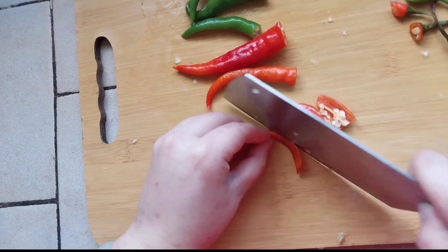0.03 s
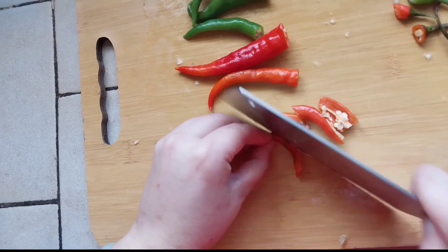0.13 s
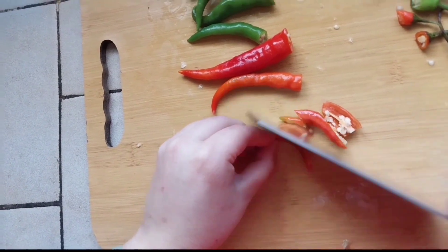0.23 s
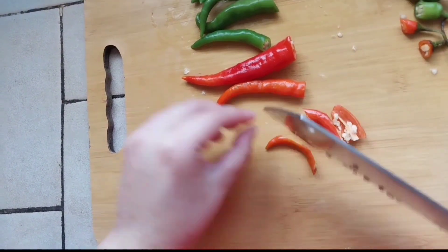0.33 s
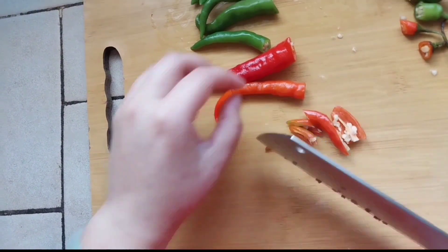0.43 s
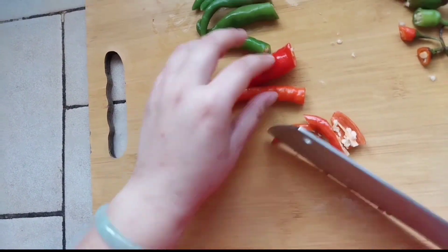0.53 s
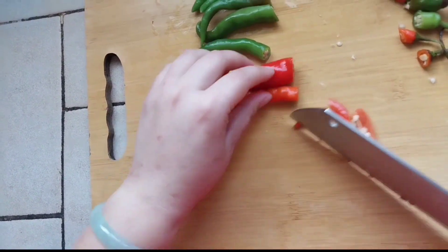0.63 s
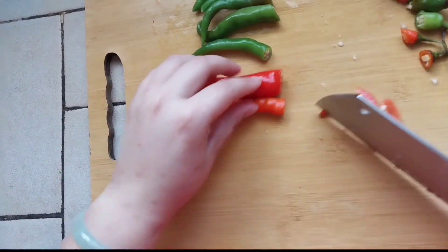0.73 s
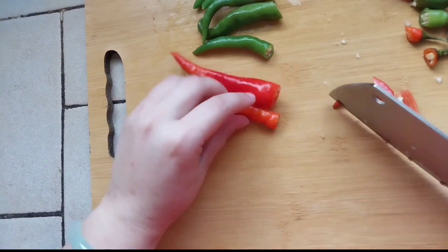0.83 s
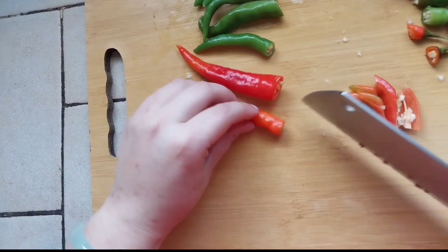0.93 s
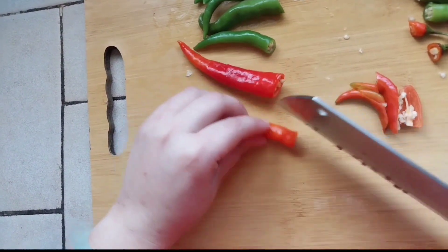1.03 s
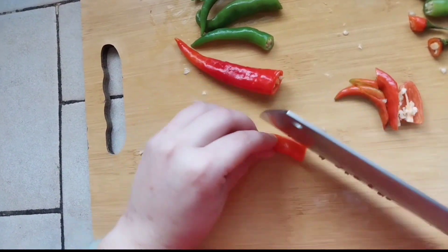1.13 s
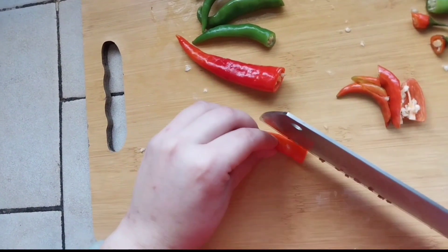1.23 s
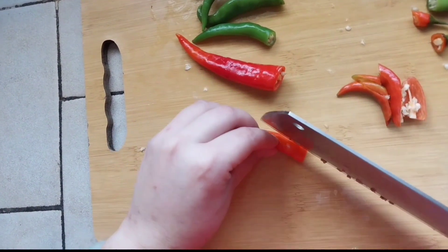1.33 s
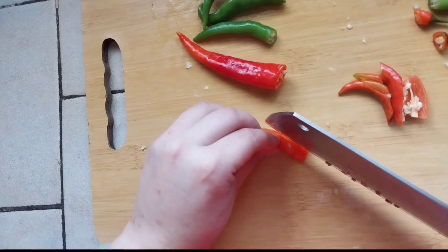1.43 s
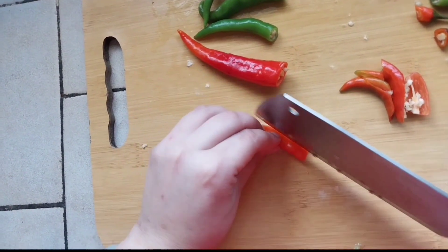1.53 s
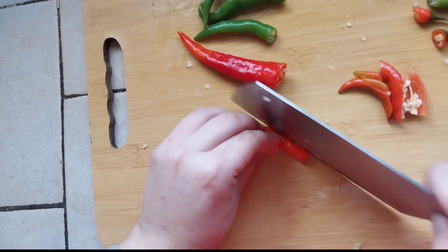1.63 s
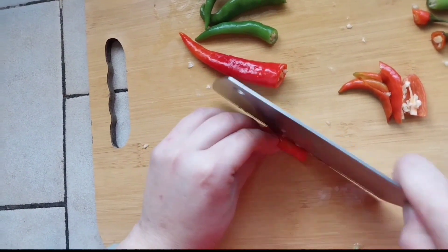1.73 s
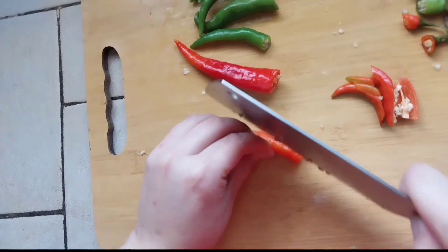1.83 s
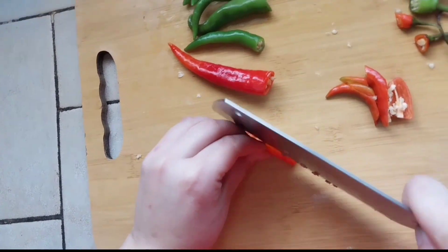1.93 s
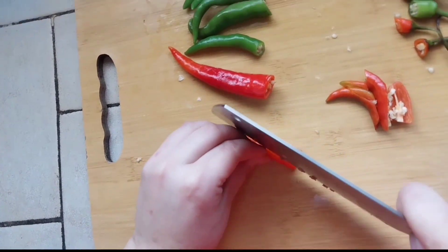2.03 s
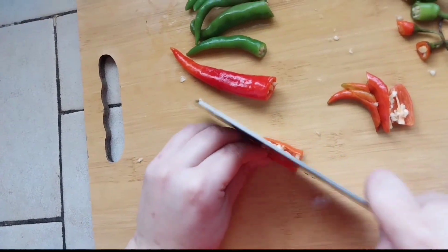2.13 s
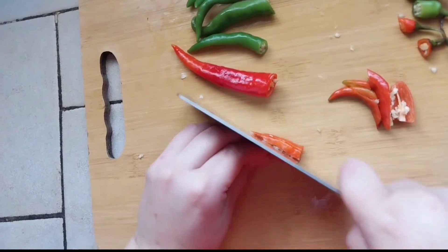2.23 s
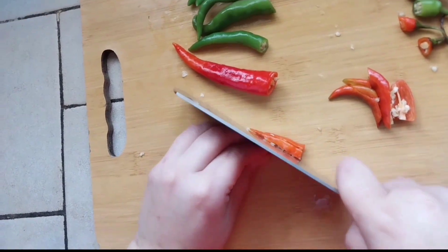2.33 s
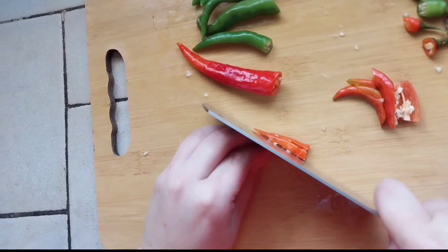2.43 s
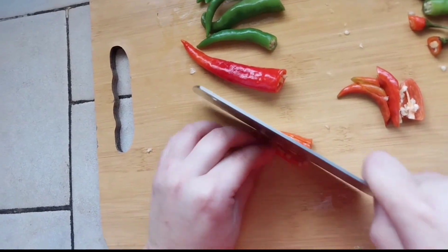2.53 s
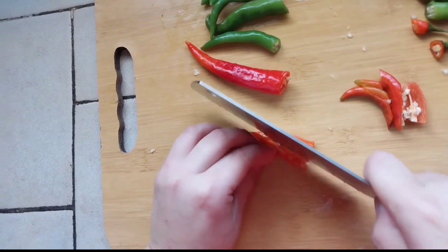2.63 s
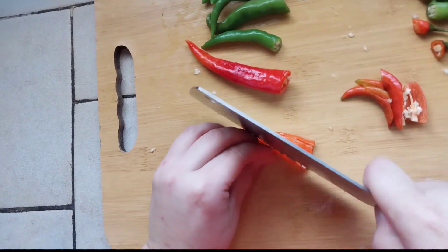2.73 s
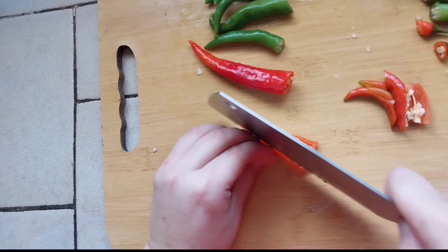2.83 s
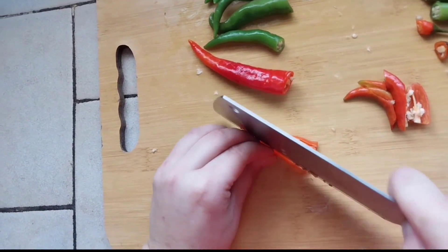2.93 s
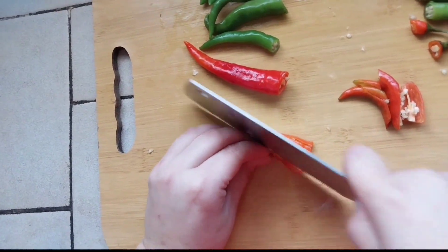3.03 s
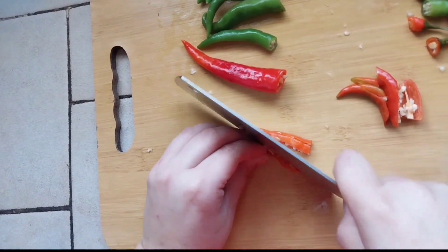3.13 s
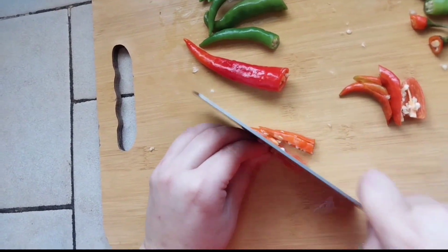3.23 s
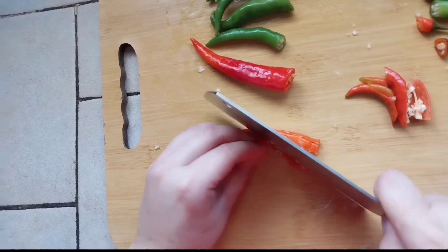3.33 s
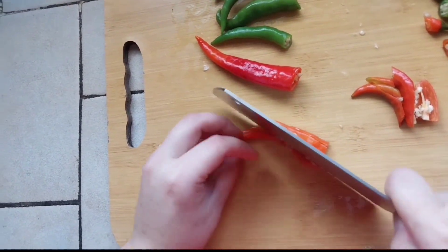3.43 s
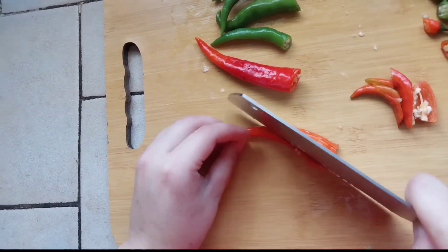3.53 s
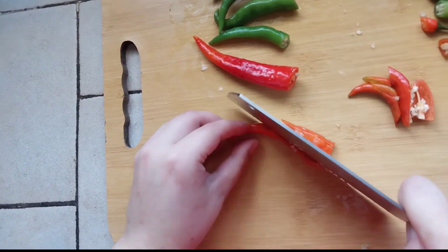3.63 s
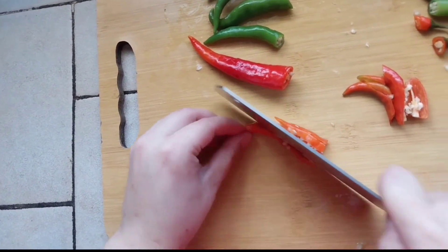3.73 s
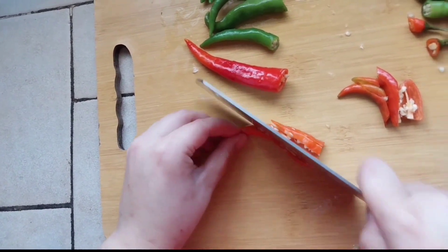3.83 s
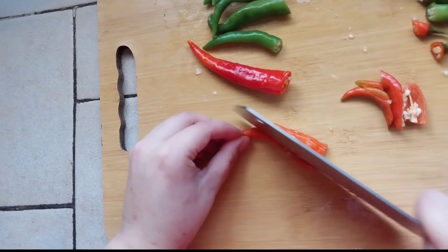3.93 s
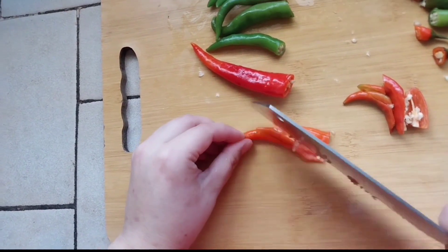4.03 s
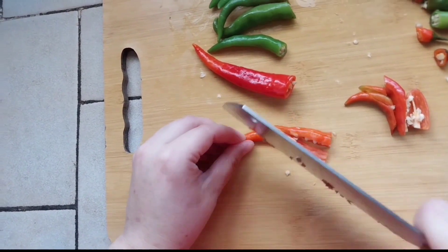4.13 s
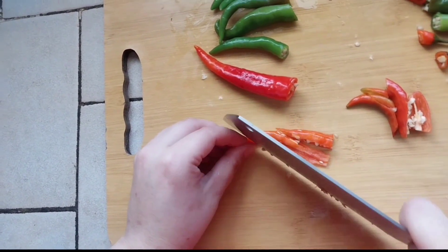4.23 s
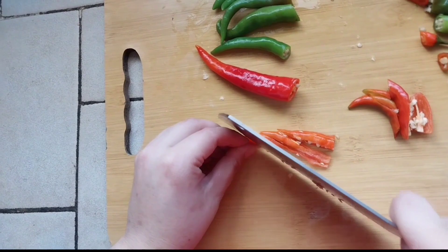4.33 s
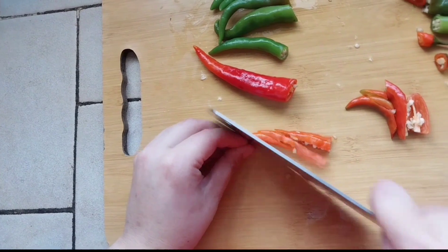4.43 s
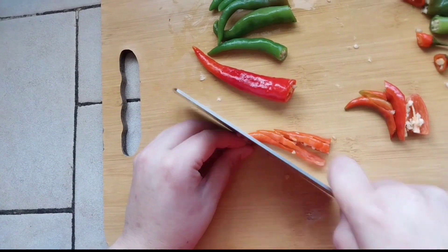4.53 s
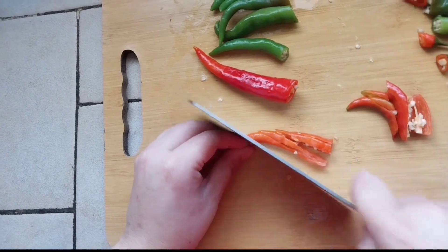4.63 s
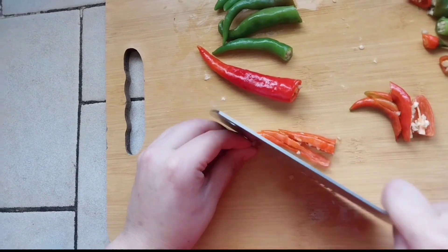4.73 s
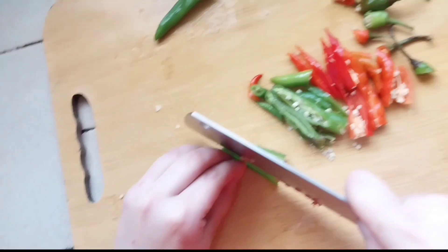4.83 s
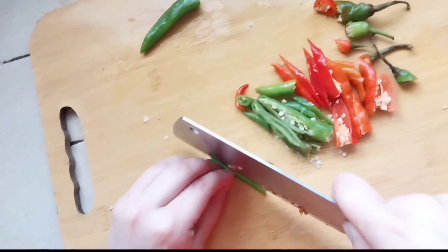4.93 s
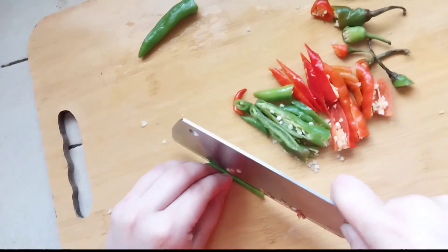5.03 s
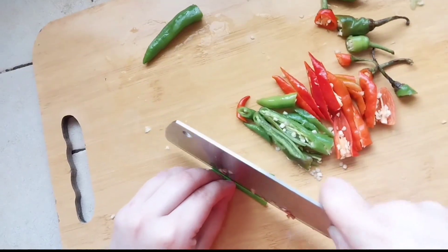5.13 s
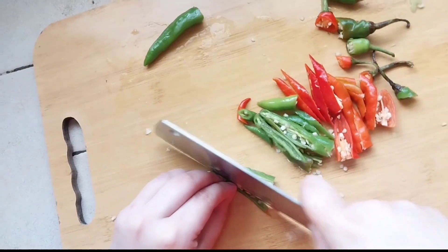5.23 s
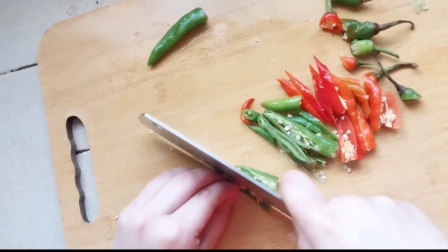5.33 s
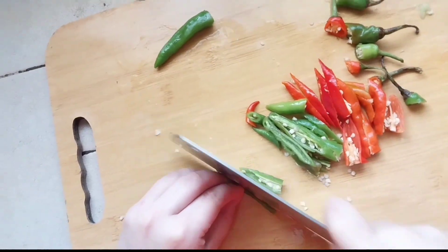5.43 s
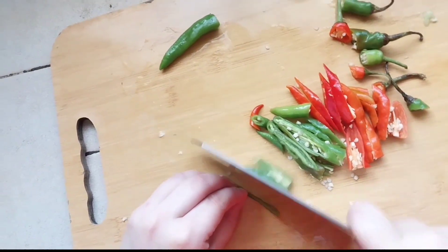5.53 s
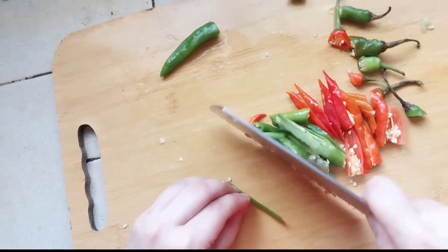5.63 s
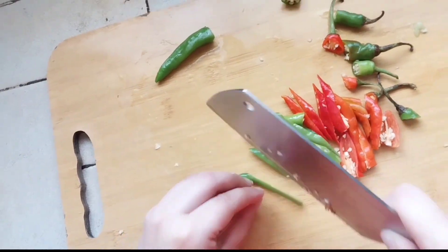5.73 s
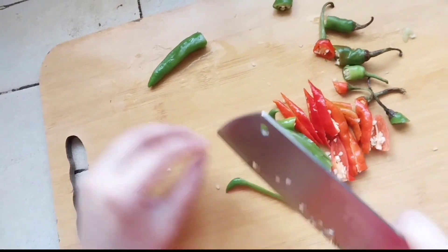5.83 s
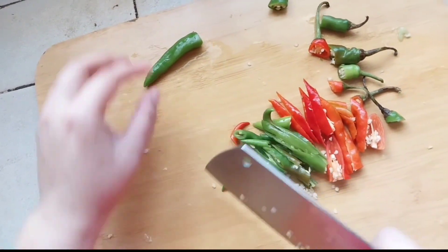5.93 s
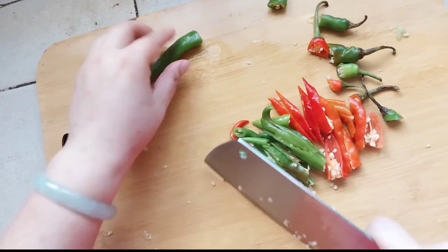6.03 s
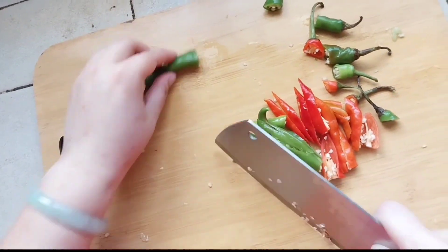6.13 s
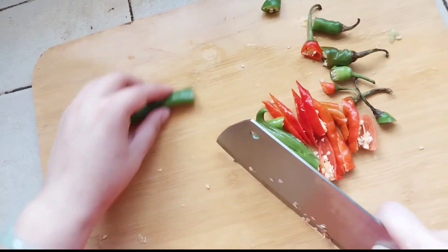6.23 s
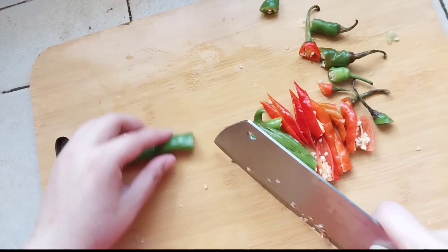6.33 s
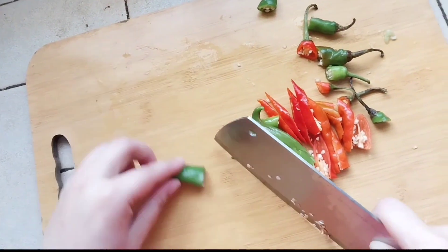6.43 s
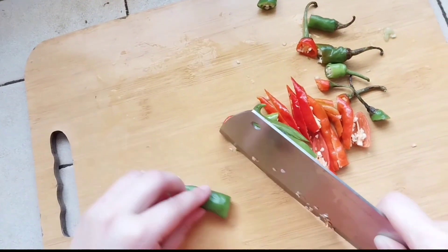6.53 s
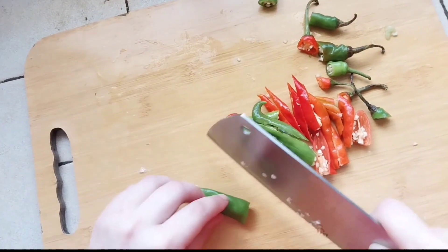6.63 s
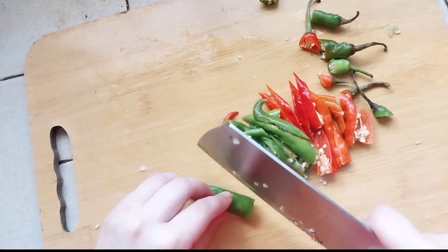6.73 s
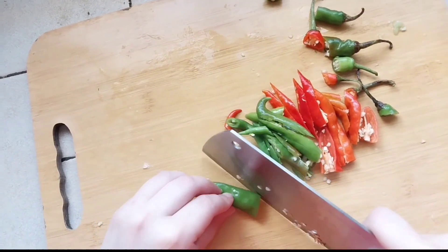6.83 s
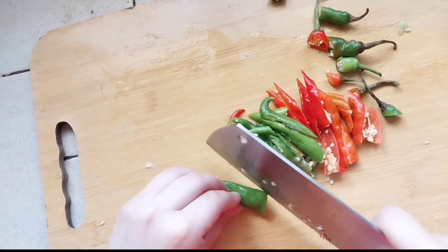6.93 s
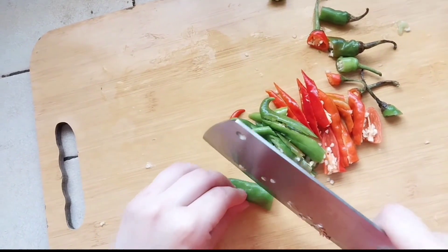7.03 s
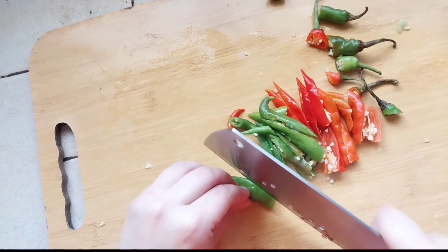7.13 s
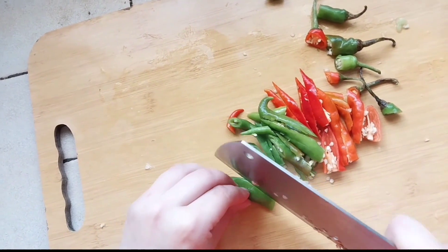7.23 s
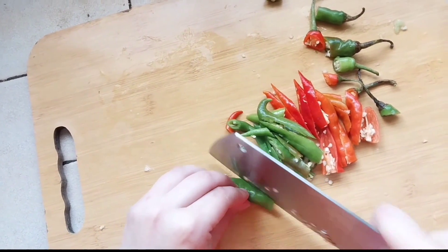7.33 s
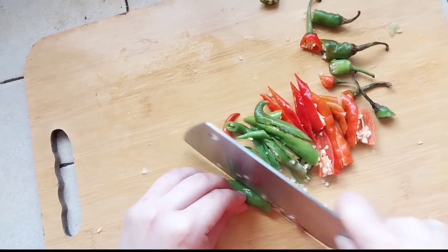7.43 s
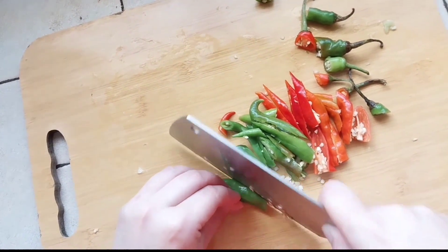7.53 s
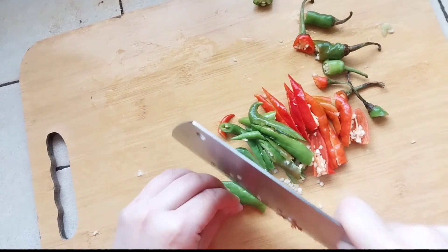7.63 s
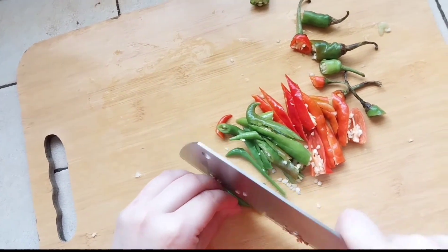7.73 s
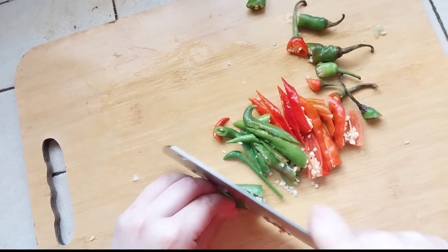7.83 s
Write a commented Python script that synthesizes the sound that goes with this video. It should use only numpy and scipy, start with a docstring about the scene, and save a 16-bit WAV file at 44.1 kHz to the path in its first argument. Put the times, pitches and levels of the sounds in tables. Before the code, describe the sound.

A cleaver crunches through chilli peppers with crisp wet slices and hard woody knocks on a cutting board, at uneven intervals in a quiet kitchen.

```python
"""In a small kitchen, a cleaver slices chilli peppers on a wooden board lying on a tiled counter.
Two close microphones hear it. Random clicks make the crunch and fizz of each cut, noise bursts make the snaps,
and bell-shaped blows make the knocks that set the wood ringing. Between cuts the flat blade scrapes slices
aside and rings. Low resonances make the board and counter rumble, delays make the kitchen echoes,
and soft coloured noise fills the background."""
import sys
import numpy as np
from scipy import signal
from scipy.fft import rfft, irfft, next_fast_len
from scipy.io import wavfile

SR = 44100
rng = np.random.default_rng(int(sys.argv[2]) if len(sys.argv) > 2 else 0)


def pcm_store(signal):
    """Save signal as 16-bit PCM."""
    levels = np.round(np.clip(np.atleast_2d(signal), -1, 1) * 32767)
    wavfile.write(sys.argv[1], SR, levels.astype(np.int16).T)


N = 347508   # length of the sound in samples

# All table levels are relative: later gains can shift them.
# The edge bites, tears or slides, or fingers brush the peppers: (start [s], length [s], push on the wood [dB],
# crunch of flesh [dB], fizz of skin and juice [dB], swell towards the end [dB], fall [dB/s])
STROKES = [(.017, 0.028, -17, -35.5, -35.5, 9.5, 601), (.075, 0.077, -41.5, -67, -70.5, -6, 900),
           (.41, 0.084, -67, -70.5, -102, -1, 103), (.76, 0.056, -62, -78, -70.5, 5, 500),
           (.985, 0.016, -81, -82, -80, 7, 152), (1.15, 0.035, -89, -86, -83, -2, 154),
           (1.33, 0.021, -86, -101, -84, 3, 100), (1.538, 0.0093, -55, -72, -55.5, 8, 596),
           (1.59, 0.043, -61, -68, -55.5, 6, 497), (1.665, .027, -24, -42, -38, 3, 415),
           (1.898, 0.0053, -60, -68, -64, 4, 900), (2.0, 0.11, -60.5, -75.5, -65, 17, 500.5),
           (2.14, 0.026, -50, -63.5, -52.5, 9.5, 595.5), (2.187, 0.011, -37.5, -53, -48, 2, 280.5),
           (2.257, 0.04, -18.5, -38.5, -37, 11.5, 999), (2.382, 0.024, -50, -62, -54.5, -3.5, 245),
           (2.53, 0.091, -65.5, -78.5, -74.5, 8, 350), (2.768, 0.0034, -70.5, -75, -70, 9, 305),
           (2.9, 0.19, -69, -66.5, -67.5, 12.5, 499.5), (3.036, 0.049, -19, -34.5, -32, 22, 1501.5),
           (3.205, 0.013, -47, -80, -78, 0, 900), (3.095, 0.02, -73, -57.5, -59, -4.5, 499),
           (3.158, 0.012, -36, -49.5, -47, 7, 270), (3.296, 0.0039, -55, -71, -60, -1, 550),
           (3.345, 0.019, -69, -60, -51, 43, 450), (3.412, 0.03, -50.5, -63.5, -59, 1.5, 252),
           (3.553, 0.0068, -53.5, -70, -64, 12, 323), (3.765, 0.15, -64, -72, -68.5, 1.5, 289.5),
           (3.93, 0.052, -50.5, -63.5, -62, 3, 592.5), (4.012, 0.015, -38, -43, -44.5, 7, 473),
           (4.128, 0.0063, -69, -95, -74.5, 1, 264), (4.456, 0.022, -14.5, -43, -39.5, 12, 457.5),
           (4.56, 0.16, -66.5, -77, -76.5, -5.5, 503), (4.78, 0.049, -81.5, -83.5, -74, -2.5, 194),
           (4.94, 0.0072, -54, -85, -65, 11, 408), (5.008, 0.0055, -59, -66, -52.5, 13.5, 650),
           (5.082, 0.049, -58, -72, -54.5, 5.5, 903), (5.172, 0.062, -51, -64.5, -46, 5.5, 805),
           (5.234, .038, -20, -38, -29.5, 8.5, 693), (5.34, 0.09, -72, -66, -62.5, 0.5, 800),
           (5.447, 0.011, -46, -58, -53.5, 3, 233), (5.855, 0.18, -60, -79, -71, 2.5, 303),
           (5.98, 0.027, -25.5, -40.5, -52, 8.5, 894), (6.41, 0.031, -53.5, -74.5, -71.5, 5, 51),
           (6.76, 0.078, -61.5, -75, -73.5, 5, 396), (6.866, 0.01, -26.5, -49, -53.5, 20, 403),
           (7.0, 0.13, -64, -80.5, -78.5, 0, 97), (7.2, 0.038, -61, -81, -74, 12, 397),
           (7.28, 0.039, -60, -80, -69, -0.5, 300), (7.31, 0.046, -40, -54, -49, 31, 209),
           (7.375, 0.071, -47, -55, -47, 1, 600), (7.421, .029, -28.5, -40.5, -41, 0, 902),
           (7.565, 0.0035, -46, -62.5, -67, 10, 310), (7.742, 0.0023, -52, -66, -58.5, 15, 600),
           (7.79, 0.054, -50, -66.5, -50.5, 29, 400)]
# The blade is dragged sideways over the wood: (start [s], length [s], push on the board [dB],
# coarse rubbing [dB], fine rubbing [dB], swell towards the end [dB], fall [dB/s])
SCRAPES = [(0.192, 0.011, -39, -53, -54.5, 2, 502), (0.213, 0.061, -48, -51.5, -47.5, 3, 506),
           (5.532, 0.058, -35, -40, -39, 4.5, 247), (6.032, 0.07, -41, -46.5, -47.5, 7, 150),
           (6.134, 0.042, -51.5, -57.5, -53.5, -3, 403)]
# How push, middle and treble (one row each) follow a stroke:
# (share of the swell [factor], share of the fall [factor], tail level [dB], tail fall [dB/s])
STROKE_SHAPES = [(1.35, 1.24, -26, 112.5), (2, 0.96, -23, 113.5), (0.96, 0.91, -21.5, 109.5)]
# Edge or slice knocks on the wood:
# (time [s], thud level [dB], contact [ms], ring level [dB], pitch favoured by where it lands [Hz])
KNOCKS = [(.0441, -19.5, 0.11, -14, 336), (.0587, -19, 0.59, -16, 400), (1.6682, -28, 0.81, -12, 700),
          (1.6962, -24, 0.32, -10, 333), (1.7095, -39, 0.39, -28, 330), (2.1937, -36.5, .25, -22.5, 700),
          (2.2615, -30.5, 0.083, -18, 708), (2.2769, -34.5, 0.31, -14.5, 700),
          (2.2974, -11, .33, -21.5, 679), (2.3858, -49, 0.2, -10, 704), (3.0867, -15.5, 0.34, -16.5, 722),
          (3.17, -36.5, 0.42, -15, 703), (3.177, -37, 0.34, -17, 600), (3.4453, -48, .23, -14, 400),
          (4.0235, -31, .25, -23.5, 1387), (4.466, -32, 0.3, -9, 650), (4.4896, -13.5, 0.29, -19.5, 577),
          (5.2479, -26, 0.9, -21, 351), (5.2719, -21.5, 0.33, -15, 300), (5.989, -34.5, 0.12, -7.5, 1500),
          (6.0038, -13.5, 0.13, -17.5, 504), (6.017, -31.5, 0.42, -6.5, 500),
          (6.868, -42.5, 0.094, -5.5, 1400), (6.8801, -16.5, .39, -19, 490), (6.908, -49.5, 0.11, -8, 1440),
          (7.3657, -35.5, 0.38, -36, 600), (7.42, -21, 0.34, -25, 553), (7.4548, -20.5, 0.71, -29, 270),
          (7.5748, -47, .34, -21, 600)]
# Skin and seeds snap: (time [s], starting level [dB], treble over middle [dB])
SNAPS = [(.0166, -20.5, 7.5), (.0257, -27, 2.5), (.197, -55, -11), (1.5433, -65, 9), (1.6095, -52, 1),
         (1.6637, -30.5, -21), (1.9004, -58, 11), (1.9978, -50.5, 7.5), (2.0729, -48, 2.5),
         (2.1426, -45, 19.5), (2.1923, -40.5, 7.5), (2.7705, -63, 9), (2.9727, -54, 7),
         (3.0835, -34.5, -14), (3.1748, -31, -3.5), (3.2991, -44.5, 1), (3.3655, -34, 21),
         (4.0228, -40.5, -12), (4.46, -38, 8.5), (4.9509, -56, 16), (5.0173, -44.5, -16.5),
         (5.0975, -39.5, 17), (5.1748, -59, 10), (5.2345, -20, 32), (5.45, -50, 3), (6.004, -29.5, -30),
         (6.8792, -28, -22), (7.2875, -53.5, -2), (7.4215, -23, -16), (7.5698, -50, 2), (7.7496, -57, 5),
         (7.8182, -34.5, 8)]
# Ringing tones of the wooden board: (pitch [Hz], level [dB], time to fall by 60 dB [s])
BOARD_MODES = [(112, -5.5, 0.28), (196, -25, 0.13), (258, -12, 0.082), (297, -4, 0.11), (383, 1.5, 0.05),
               (479, -3.5, 0.073), (560, 2.5, 0.022), (638, 5.5, .025), (680.4, -3, 0.11), (744, -3, 0.11),
               (770, 6.5, 0.013), (965, -10, 0.17), (1212, -15, 0.021), (1320, -14.5, 0.072),
               (1470, -7.5, 0.023), (1700, -15.5, 0.054), (1983, -8.5, 0.038), (2350, -18.5, .05),
               (2440, -21, 0.064)]
# Ringing tones of the steel blade: (pitch [Hz], width [Hz], level [dB])
BLADE_MODES = [(819, 32, -0.5), (1428, 26, 0), (1640, 50, -11.5), (2705, 7.4, 4.5), (5660, 63, -8),
               (6245, 15, 10), (7150, 260, -12.5), (7680, 120, -7.5), (10780, 71, -10.5), (11500, 200, -6),
               (12500, 100, -3), (13600, 90, -13), (14330, 60, -11.5)]
# Tone colour of the crunch, also of coarse rubbing: (frequency [Hz], level per Hz [dB])
CRUNCH_COLOUR = [(600, -22.5), (1100, 0.5), (1400, 3.5), (2000, -2), (2700, 0.5), (3800, -4), (5500, -23),
                 (9000, -29)]
# Tone colour of the fizz of tearing: (frequency [Hz], level per Hz [dB])
TEARING_COLOUR = [(2500, -23), (4200, -1), (6000, 1.5), (8500, -3.5), (12000, 0), (14500, -1.5),
                  (16000, -12)]
# Tone colour of fine rubbing: (frequency [Hz], level per Hz [dB])
RUBBING_COLOUR = [(2500, -37), (4200, -7.5), (6000, -8.5), (8500, -11), (10000, -10.5), (12000, -8),
                  (14500, -12), (16000, -8.5)]
# Hands or a chop rock the board on the counter: (time [s], hold [s], board rumble [dB], counter rumble [dB])
ROCKS = [(.02, 0.089, -53, -50), (0.24, 0.018, -63, -68.5), (.5, .03, -87, -71), (0.59, 0.022, -68, -73),
         (.8, 0.0084, -58.5, -65.5), (1.001, 0.011, -57, -64), (1.171, 0.028, -58, -63.5),
         (1.394, .01, -63.5, -70), (1.558, 0.026, -53.5, -63), (1.68, 0.0072, -49.5, -47.5),
         (1.91, 0.081, -63, -67), (2.08, 0.068, -60, -64), (2.26, 0.064, -47.5, -56.5),
         (2.6, 0.0077, -68, -71), (2.76, 0.11, -59, -57.5), (3.045, 0.074, -50.5, -60),
         (3.197, .12, -54, -65.5), (3.404, 0.083, -66, -58), (3.58, .01, -56.5, -60),
         (3.774, 0.1, -59.5, -57.5), (4.014, 0.011, -56.5, -54), (4.144, .05, -63.5, -70.5),
         (4.461, 0.08, -59, -53), (4.794, 0.15, -52.5, -61), (4.972, 0.059, -53.5, -57),
         (5.096, 0.025, -54, -64), (5.257, 0.0037, -48.5, -48.5), (5.394, 0.028, -77.5, -62),
         (5.478, 0.15, -51, -58.5), (5.708, 0.021, -61, -61), (5.954, 0.11, -50.5, -57),
         (6.2, .01, -59.5, -58), (6.403, 0.14, -56, -57.5), (6.78, 0.16, -49, -55), (7.2, 0.16, -55, -61.5),
         (7.443, .01, -40, -48), (7.603, 0.012, -58, -53), (7.751, 0.091, -53, -54.5)]
# Low tones of the board rocking on the counter: (pitch [Hz], width setting [Hz], level [dB])
ROCKING_MODES = [(150, 19, 3.5), (200, 17, 8.5), (235, 29.6, 1), (323.3, 12, -2), (356, 5.4, -26.5)]
# Low tones of the counter: (pitch [Hz], width setting [Hz], level [dB])
COUNTER_MODES = [(50, 53, -15), (89.4, 9.8, -2.5), (108, 13, -5)]
# Tone colour of kitchen air and microphone noise: (frequency [Hz], level per Hz [dB])
AIR_COLOUR = [(15, -30.5), (25, -3.5), (43, -10.5), (92, -4), (195, -8), (363, -15.5), (560, -36.5),
              (641, -23), (1260, -31.5), (3250, -34), (5880, -25.5), (8590, -37.5), (11600, -33),
              (14800, -33.5), (16000, -54.5)]

ONSET_DB_PER_S = 3001   # rise of level up to the start of a stroke
SWELL_BEND = 1.13   # over 1 the swell levels off towards its end
CRUNCH_FLICKER_DB, STEEL_FLICKER_DB = 2.5, 3.0
SNAP_DYING_MS = 9   # time to fall by 60 dB
EDGE_PAN_DB = -1.3   # left minus right, for knocks and snaps
FAVOUR_DB, FAVOUR_OCTAVES = 7, 0.24   # boost and reach around a knock's favoured pitch
GRIP_HZ = 380   # the judder holds little below this pitch
KNOCK_INTO_STEEL_DB = -9   # knocks also ring the blade
ROCK_RISE_DB_PER_S, ROCK_FALL_DB_PER_S = 292, 151.5
ALIKE_BELOW_HZ, BASS_LIKENESS = 900, 0.9   # both microphones hear the bass alike, the treble each its own
KITCHEN_T60_S, KITCHEN_DB, WALL_CUT_HZ = 0.33, -29, 20000
AIR_DB = -67
WHINE_HZ, WHINE_WIDTH_HZ, WHINE_DB = 5700, 390, -100   # a faint narrow hiss
CUTOFF_HZ = 15900


def cutting():
    """Flesh crunches and skin cells burst under the edge: random clicks, coloured twice."""
    bursts = grains(per_s=11000, spread_db=2.5)
    flicker = amp(CRUNCH_FLICKER_DB * drift(45))
    crunch = flicker * gains(STROKES, axis=1) * rms_one(colour(bursts, CRUNCH_COLOUR))
    fizz = gains(STROKES, axis=2) * rms_one(colour(bursts, TEARING_COLOUR))
    return crunch + fizz


def snaps():
    """Each snap is a burst of noise that dies within milliseconds, its middle and treble weighed apart."""
    out = np.zeros((2, N))
    t = np.arange(1200) / SR
    noise = rng.choice([-1., 1.], (len(SNAPS), 2, len(t)))
    middle = signal.sosfilt(signal.butter(2, [1300, 5000], "band", fs=SR, output="sos"), noise)
    treble = signal.sosfilt(signal.butter(2, 5000, "high", fs=SR, output="sos"), noise)
    for (s, db, bright_db), low, high in zip(SNAPS, middle, treble):
        burst = amp(min(-bright_db, 0)) * low + amp(min(bright_db, 0)) * high
        fade = amp(db - 60e3 * t / SNAP_DYING_MS)
        start = round(s * SR)
        out[:, start:start + len(t)] += fade * sides(EDGE_PAN_DB) * burst
    return amp(6.5) * out


def knocks():
    """A bell-shaped force: its second derivative, sign flipped, is the thud, and it strikes modes unevenly."""
    thud, blows = np.zeros((2, N)), np.zeros((len(BOARD_MODES), 2, N))
    mode_hz = np.array(BOARD_MODES)[:, :1, None]
    per_mode = (len(KNOCKS), len(BOARD_MODES), 1, 1)
    uneven = amp(3.0 * rng.standard_normal(per_mode))
    share = likeness(mode_hz, BASS_LIKENESS)
    lobes = rng.standard_normal(per_mode) * [[1], [-1]]   # high modes beam unevenly left and right
    uneven = uneven * (np.sqrt(1 + share) + np.sqrt(1 - share) * lobes)
    for (s, db, contact_ms, ring_db, favoured_hz), strengths in zip(KNOCKS, uneven):
        octaves_off = np.log2(mode_hz / favoured_hz)
        mode_db = ring_db + FAVOUR_DB * np.exp(-(octaves_off / FAVOUR_OCTAVES) ** 2)
        u = np.arange(-170, 171) / (contact_ms / 1000 * SR)   # time counted in contact times
        at = slice(round(s * SR) - 170, round(s * SR) + 171)
        bell = amp(db) * sides(EDGE_PAN_DB) * np.exp(-u * u / 2)
        thud[:, at] += (1 - u * u) * bell
        unit_bell = bell * (u[1] - u[0]) / np.sqrt(2 * np.pi)   # equal push whatever the contact time
        blows[:, :, at] += amp(mode_db) * strengths * unit_bell
    soft_wood = signal.butter(2, [110, 1100], "band", fs=SR, output="sos")   # soft wood dulls the thud
    return signal.sosfilt(soft_wood, thud), blows


def judder():
    """The edge sticks and slips on the wood while it cuts or scrapes: random clicks without bass."""
    slips = signal.lfilter(*signal.butter(2, GRIP_HZ, "high", fs=SR), grains(per_s=3200, spread_db=3.5))
    return amp(-37.0) * slips * gains(STROKES + SCRAPES, axis=0)


def board(shake, blows):
    """The wood rings with all its modes; each blow has its own strength per mode."""
    modes = 0
    for blow, (hz, db, t60) in zip(blows, BOARD_MODES):
        modes = modes + amp(db) * ring(shake + blow, hz, t60)
    # a small plate radiates no deep bass
    return signal.sosfilt(signal.butter(4, 130, "high", fs=SR, output="sos"), modes)


def scraping(ticks):
    """Friction noise, direct and through steel modes that flicker as the contact moves; ticks ring them too."""
    rub = grains(per_s=8300, spread_db=-1.5)
    fine = gains(SCRAPES, axis=2)
    direct = gains(SCRAPES, axis=1) * rms_one(colour(rub, CRUNCH_COLOUR))
    direct = direct + fine * rms_one(colour(rub, RUBBING_COLOUR))
    # the ringing fades sooner than the hiss: its drive follows the fine rubbing more steeply
    drive = amp(28.0) * fine ** 1.314 * rub + amp(-9.0) * ticks
    steel = 0
    for hz, width_hz, db in BLADE_MODES:
        flicker = amp(STEEL_FLICKER_DB * drift(35))   # each mode has its own
        steel = steel + amp(db) * resonance(drive * flicker, hz, width_hz)
    return direct + steel


def rumble():
    """Soft contact noise in the low modes of board and counter."""
    lumps = grains(per_s=2700, spread_db=2.5, bass=0.68)
    out = 0
    for column, modes in ((2, ROCKING_MODES), (3, COUNTER_MODES)):
        low = 0
        for hz, width_hz, db in modes:
            once = resonance(lumps, hz, 2 * width_hz)
            low = low + amp(db) * resonance(once, hz, 2 * width_hz)   # twice, for steeper flanks
        out = out + rocking(axis=column) * rms_one(low)
    return out


def kitchen(x):
    """The room answers with eight feedback delays a side, duller on every round."""
    size = next_fast_len(N + SR // 2, True)
    w = 2 * np.pi * np.arange(size // 2 + 1) / size
    dull = np.exp(-2 * np.pi * WALL_CUT_HZ / SR)
    walls = (1 - dull) / (1 - dull * np.exp(-1j * w))
    echoes = np.zeros((2, len(w)), complex)
    for k, lag in enumerate(np.geomspace(.009, .033, num=16) * SR):
        loop = amp(-60 * lag / SR / KITCHEN_T60_S) * walls * np.exp(-1j * w * lag)
        echoes[k % 2] += (-1) ** (k // 2) * loop / (1 - loop)   # endless rounds summed in one go
    return irfft(rfft(x, size) * echoes, size)[:, :N]


def air():
    """Steady coloured background noise with one narrow hiss."""
    wide = amp(AIR_DB) * rms_one(colour(grains(per_s=SR, spread_db=1.5, bass=0.27), AIR_COLOUR))
    whine = resonance(rng.standard_normal((2, N)), WHINE_HZ, WHINE_WIDTH_HZ)
    return wide + amp(WHINE_DB) * rms_one(whine)


def amp(db):
    """Turn a level in dB into a gain."""
    return 10 ** (np.asarray(db) / 20)


def rms_one(x):
    """Scale a sound to an average strength (rms) of 1."""
    return x / np.sqrt(np.mean(x ** 2) + 1e-20)


def gains(rows, axis):
    """Gain in time of one layer: each stroke sets in, swells to its end, falls and leaves a faint tail."""
    lead = round(.03 * SR)   # room for the onset before the start
    out = np.zeros(lead + N + SR)
    swells, falls, tail_db, tail_fall = STROKE_SHAPES[axis]
    for s, length, *levels, swell_db, fall in rows:
        t = np.arange(-lead, round((length + .4) * SR)) / SR
        after = np.maximum(t - length, 0)
        onset = ONSET_DB_PER_S * np.minimum(t, 0)
        swell = swells * swell_db * np.clip(1 - t / length, 0, 1) ** SWELL_BEND
        body = amp(onset - swell - falls * fall * after)
        tail = amp(tail_db - tail_fall * after) * (after > 0)
        start = round(s * SR)
        out[start:start + len(t)] += amp(levels[axis]) * (body + tail)
    return out[lead:lead + N]


def rocking(axis):
    """Gain in time of one rumble: each rocking rises, holds and fades."""
    t = np.arange(0, N, 40) / SR   # coarse steps, joined by lines below
    rows = np.array(ROCKS)[:, :, None]
    early = np.maximum(rows[:, 0] - t, 0)
    late = np.maximum(t - rows[:, 0] - rows[:, 1], 0)
    gain = amp(rows[:, axis] - ROCK_RISE_DB_PER_S * early - ROCK_FALL_DB_PER_S * late).sum(axis=0)
    return np.interp(np.arange(N) / SR, t, gain)


def grains(per_s, spread_db, bass=BASS_LIKENESS):
    """Two channels of random clicks of uneven size, less alike towards the treble; rms 1."""
    sizes = amp(spread_db * np.minimum(rng.exponential(1, (2, N)), 5)) * rng.choice([-1, 1], (2, N))
    mid, side = sizes * (rng.random((2, N)) < per_s / SR)
    size = next_fast_len(N, True)
    alike = likeness(np.arange(size // 2 + 1) * SR / size, bass)
    shared = np.sqrt(1 + alike) * rfft(mid, size)
    opposed = np.sqrt(1 - alike) * rfft(side, size) * [[1], [-1]]
    return rms_one(irfft(shared + opposed, size)[:, :N])


def likeness(hz, bass):
    """Left-right likeness, falling with frequency."""
    return np.clip(bass, 0, 1) / (1 + (hz / ALIKE_BELOW_HZ) ** 4)


def sides(pan_db):
    """Left and right gain."""
    return amp(np.array([[pan_db / 2], [-pan_db / 2]]))


def drift(per_s):
    """Slow wandering: random values of spread 1, joined by straight lines."""
    steps = rng.standard_normal(400)
    return np.interp(np.arange(N) / SR * per_s, np.arange(len(steps)), steps)


def colour(x, spectrum):
    """Weigh each frequency of a sound by a (Hz, dB) curve."""
    hz, db = np.transpose(spectrum)
    size = next_fast_len(N)
    log_hz = np.log(np.maximum(np.arange(size // 2 + 1) * SR / size, 1))
    weights = amp(np.interp(log_hz, np.log(hz), db))
    return irfft(rfft(x, size) * weights, size)[..., :N]


def resonance(x, hz, width_hz):
    """Two-pole resonance that favours one pitch, with gain about 1 on top."""
    r = np.exp(-np.pi * width_hz / SR)
    top = (1 - r * r) / 2
    return signal.lfilter([top, 0, -top], [1, -2 * r * np.cos(2 * np.pi * hz / SR), r * r], x)


def ring(force, hz, t60):
    """A mode as a dying sine: a unit click sets it ringing from height 1."""
    r, w = amp(-60 / (t60 * SR)), 2 * np.pi * hz / SR
    return signal.lfilter([0, np.sin(w)], [1, -2 * r * np.cos(w), r * r], force + 1e-18)


def scene():
    """Everything on the board sounds into the kitchen; rumble and air are added without echoes."""
    thud, blows = knocks()
    ticks = snaps()
    wood = board(judder(), blows)
    blade = scraping(ticks + amp(KNOCK_INTO_STEEL_DB) * thud)
    near = thud + wood + ticks + cutting() + blade
    return near + amp(KITCHEN_DB) * kitchen(near) + rumble() + air()


def record(dry):
    """A steep filter cuts the top; it is 60 dB down from the cutoff upwards."""
    return signal.sosfilt(signal.cheby2(14, 60, CUTOFF_HZ, fs=SR, output="sos"), dry)


dry = scene()
out = record(dry)
pcm_store(out)
```